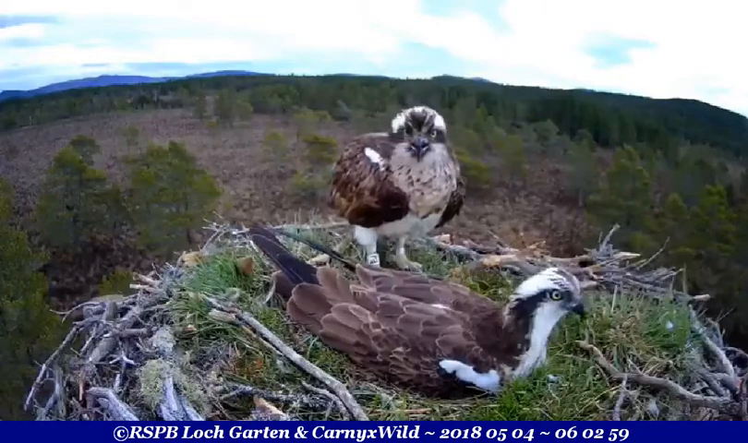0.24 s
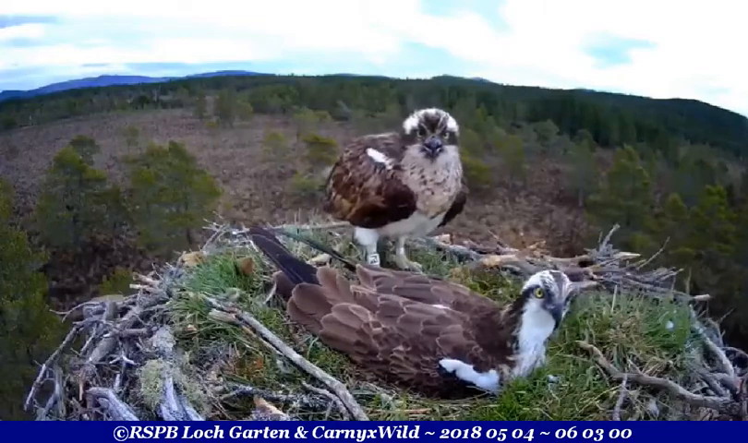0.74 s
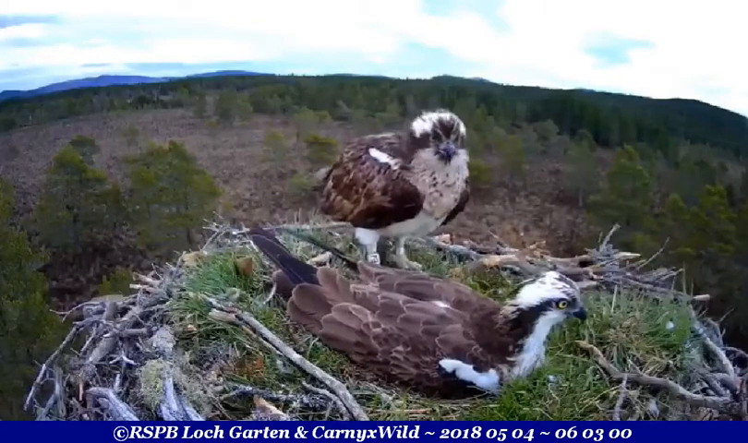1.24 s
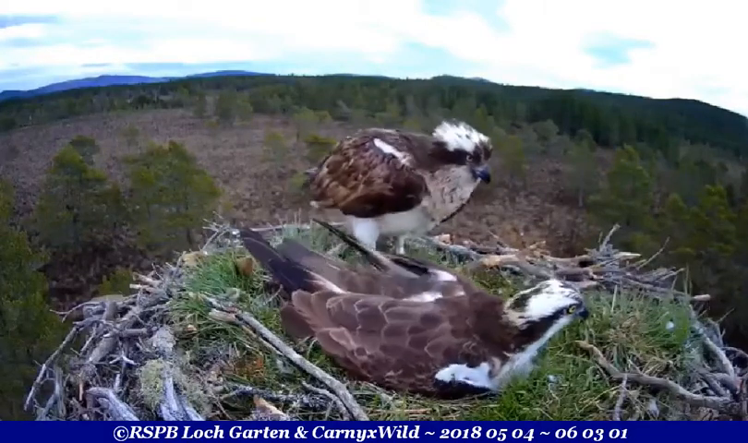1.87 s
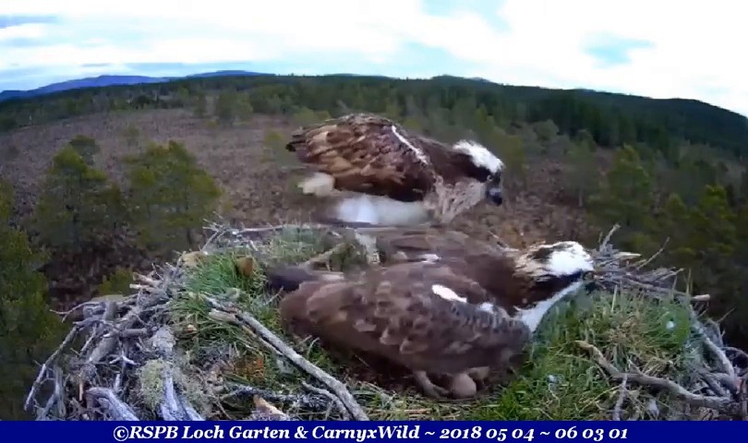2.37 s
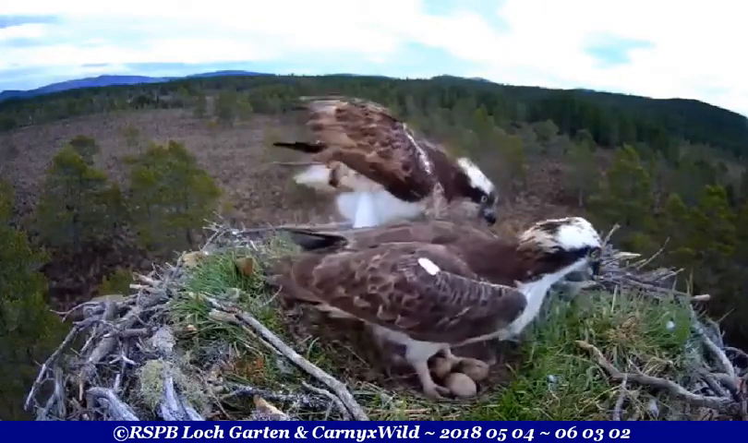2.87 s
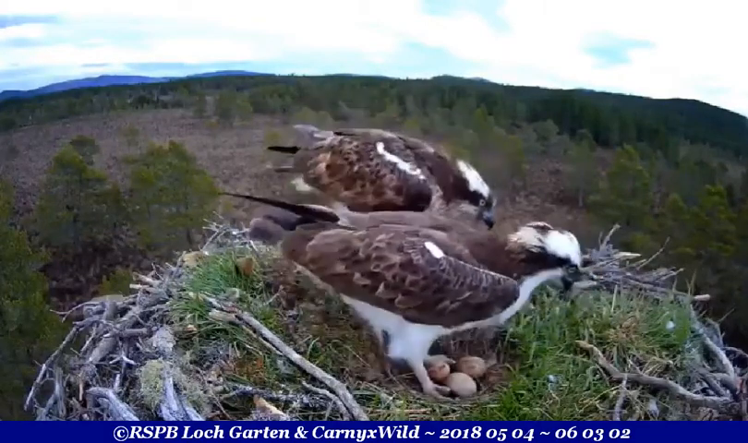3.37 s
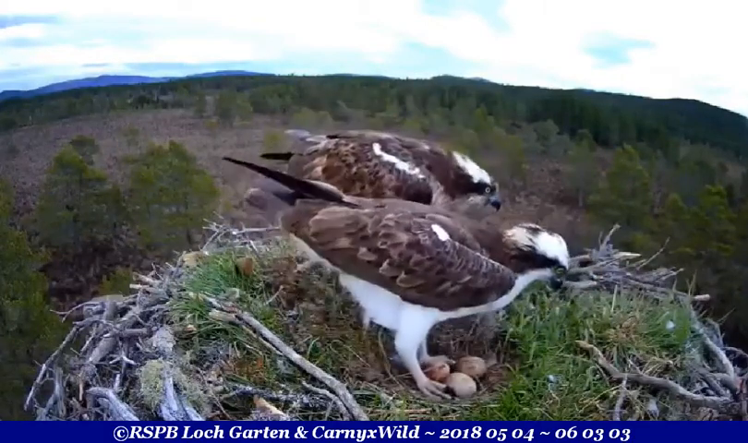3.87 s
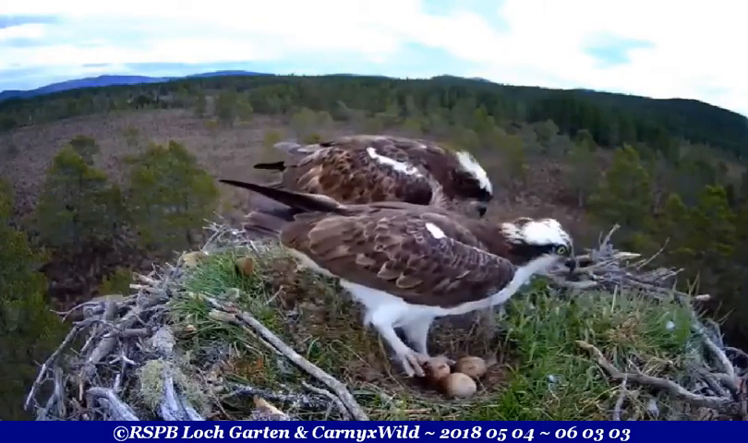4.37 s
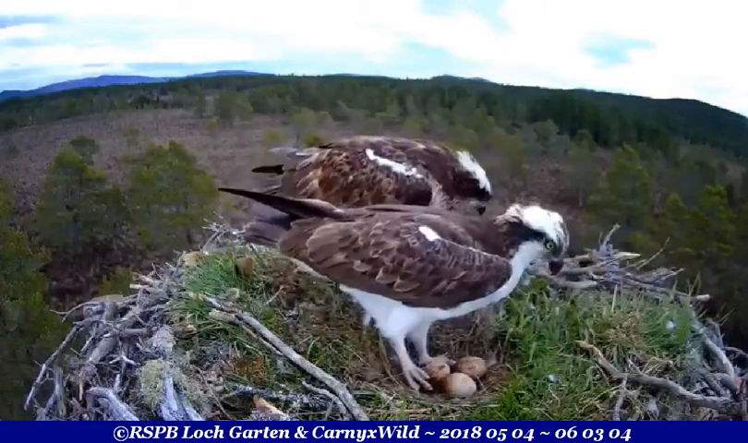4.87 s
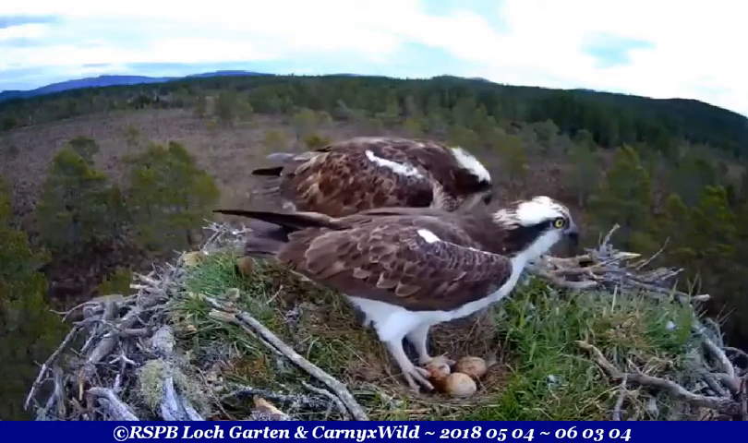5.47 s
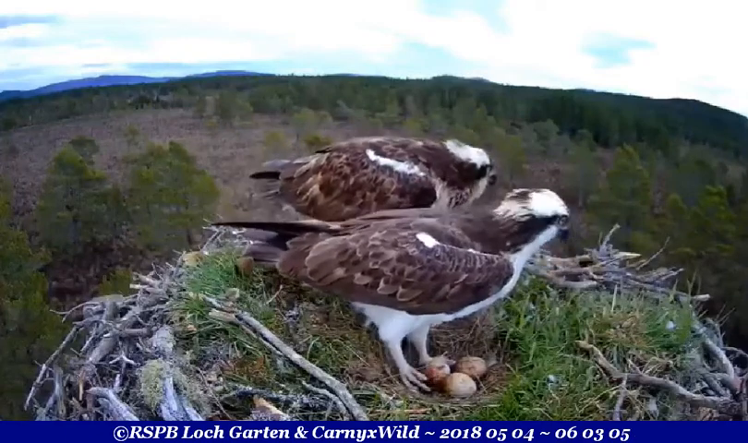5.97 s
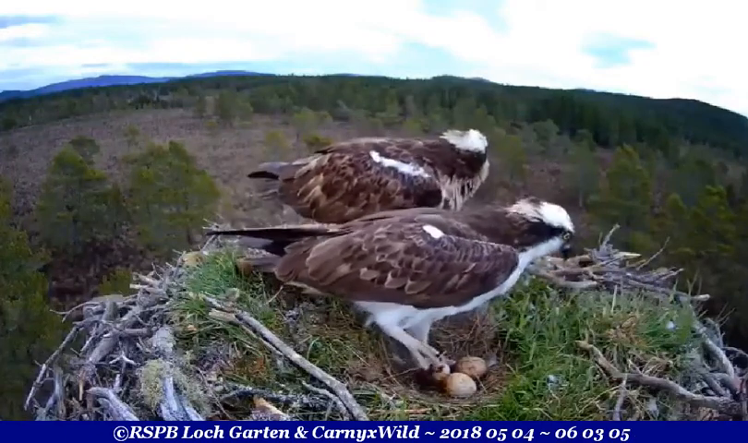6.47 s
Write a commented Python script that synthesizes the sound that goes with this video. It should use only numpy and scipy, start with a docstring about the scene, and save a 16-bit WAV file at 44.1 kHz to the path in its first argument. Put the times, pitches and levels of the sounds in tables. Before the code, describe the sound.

A steady broadband hiss, low soft rush, faint mains hum and very thin high electronic whine start at once and continue to the end. From 0.15 s an osprey very near the microphone gives six short piping whistles around 2 kHz, about every 0.2 s, until 1.5 s; the first are loud enough to clip, later ones weaken. Tiny bill ticks and quick chirps surround them, with a soft low bump at the first. From 1.7 to 2.6 s, four longer yelps crack upward into a rough thin tone and drop back. After a gap, faint high peeps begin at 3.4 s and grow, becoming upward scoops from 4.1 s, long falling glides from 4.7 s and humped slides around 5.2-5.5 s, lightly echoing in trees. Quieter pips overlap from about 4.9 s and continue regularly to 6.7 s; a faint upward slur passes at 5.8 s. Brief dropouts interrupt the birds and thin the hiss.

```python
"""Hiss, a low rush, mains hum and a thin line whistle come first and never stop. Almost at once two ospreys
pipe at their nest, right beside the microphone: short pips, the first ones loud enough to overload it, with
faint ticks and chirps around them. Yelps that break upward follow, then thin sliding whistles that run into
a second row of pips. Calls are swept tones with overtones, shaped by a throat resonance and echoed by nest
and trees; the bed is coloured noise and steady sines. Now and then the sound cuts out briefly."""
import sys
import numpy as np
from scipy import signal
from scipy.fft import rfft, irfft, next_fast_len
from scipy.io import wavfile
from scipy.ndimage import uniform_filter1d, map_coordinates

SR = 44100
rng = np.random.default_rng(int(sys.argv[2]) if len(sys.argv) > 2 else 0)


def unload_wav(signal):
    """Save mono or channel-first audio to the path in sys.argv[1] as 16-bit WAV at rate SR, clipped to [-1, 1]."""
    wavfile.write(
        sys.argv[1],
        SR,
        np.round(np.clip(np.atleast_2d(signal).T, -1, 1) * 32767).astype(np.int16),
    )


N = 295911
TIME = np.arange(N) / SR
MAINS_HZ = 50


def amp(db):
    """Level to amplitude: 20 dB is a factor of ten."""
    return 10 ** (np.asarray(db) / 20)


def unit(x):
    """Normalisation to unit root mean square."""
    return x / np.sqrt(np.mean(x ** 2) + 1e-20)


def along(points, hz):
    """Interpolation of (f/Hz, value) points on a logarithmic frequency axis."""
    f, value = np.transpose(points)
    return np.interp(np.log(hz + 1), np.log(f + 1), value)


def wobble(rate, size):
    """Band-limited random modulation: a smooth curve through random knots, rate knots a second."""
    knots = rng.standard_normal(int(size * rate / SR) + 4)
    return map_coordinates(knots, [np.arange(size) * rate / SR])


def filtered(x, response):
    """Linear filtering: the spectrum times a response of frequency."""
    m = next_fast_len(N + SR // 2)
    spectrum = rfft(x, m)
    return irfft(spectrum * response(np.fft.rfftfreq(m, 1 / SR)), m)[:N]


def noise(spectrum):
    """Coloured noise of rms 1: white noise under a spectral envelope."""
    return unit(filtered(rng.standard_normal(N), lambda hz: amp(along(spectrum, hz))))


def tone(hz):
    """Simple harmonic oscillation of rms 1 at a random phase."""
    return np.sqrt(2) * np.sin(2 * np.pi * (hz * TIME + rng.random()))


def add(track, s, sound):
    """Superposition: mix a sound into the track at time s."""
    part = track[max(round(s * SR), 0):][:len(sound)]
    part += sound[:len(part)]


def floor_levels():
    """Slow level drift: hiss and line whistle levels against time, before their trims."""
    # steady background: t/s, hiss level/dB, line whistle level/dB
    floor = [(0.0, -44.5, -47), (1.25, -46, -61), (3.18, -44.5, -49), (6.47, -42.5, -47.5),
             (6.71, -42, -52)]
    s, *levels = np.transpose(floor)
    return [np.interp(TIME, s, level) for level in levels]


def hiss(hiss_db, on, trim_db=5.0, dropout_db=-8):
    """Broadband noise, nearly flat in spectrum, that weakens in a dropout."""
    # hiss spectrum: f/Hz, relative level per Hz/dB
    colour = [(100, -7.5), (600, -2), (1000, -1.5), (1500, -3.5), (3000, -.5), (5000, -1.3), (10000, -0.23),
              (15500, -0.63)]
    return amp(hiss_db + trim_db + dropout_db * (1 - on)) * noise(colour)


def rush(hiss_db, on, mean_db=-47.0, follow=.3, dropout_db=-3):
    """Low-frequency band noise that follows the hiss drift in part and dips a little in a dropout."""
    # rush spectrum: f/Hz, relative level per Hz/dB
    colour = [(20, -19), (65, -31), (110, -7), (170, 0), (260, 1), (380, -3.5), (500, -10.5), (700, -35),
              (1500, -26)]
    drift = follow * (hiss_db - hiss_db.mean())
    return amp(mean_db + drift + dropout_db * (1 - on)) * noise(colour)


def mains(buzz_db=-76, trim_db=-1.5):
    """Harmonic series of the mains frequency, each level slightly unsteady, with a faint steady buzz."""
    # hum harmonics: f/Hz, rms level before the trim/dB
    harmonics = [(50, -66), (100, -64.5), (150, -62.5), (200, -50), (250, -54), (300, -53), (350, -56.5),
                 (400, -60), (450, -70), (500, -69), (900, -69), (1000, -60.5), (1400, -70), (1500, -78)]
    hum = sum(amp(db + trim_db + wobble(2.88, N)) * tone(hz) for hz, db in harmonics)
    buzz = sum(tone(MAINS_HZ * k) for k in range(11, 33))
    return hum + amp(buzz_db) * buzz


def line_whistle(line_db, trim_db=3, line_hz=15625):
    """A gated sine: scanning at the line rate whistles and pauses between fields."""
    scanning = TIME * MAINS_HZ % 1 > .06
    return amp(line_db + trim_db) * scanning * tone(line_hz)


def bump(s=0.13, width=0.046, db=-47):
    """Noise under a Gaussian envelope: a soft low bump around the first pip."""
    envelope = np.exp(-((TIME - s) / width) ** 2 / 2)
    return amp(db) * envelope * noise([(40, -18), (140, 2), (300, -21), (900, -60)])


def ticks(ring_hz=1900, t60=0.025, crack=0.41):
    """Damped oscillation: a small click of the bill rings and cracks ahead of the first pips."""
    # bill clicks: t/s, level/dB
    clicks = [(.084, -32), (0.314, -29), (.537, -30.5), (.759, -33.5), (.980, -38)]
    out, t = np.zeros(N), np.arange(SR // 20) / SR
    for s, db in clicks:
        click = np.sin(2 * np.pi * ring_hz * t) + crack * rng.standard_normal(len(t))
        add(out, s, amp(db - 60 * t / t60) * click)
    return out


def progress(length, edge):
    """Normalised time: share of a note's length gone by, with half a fade (edge, s) before and after."""
    return np.arange(-edge / 2, length + edge / 2, 1 / SR) / length


def strain(s):
    """Spectral brightening under effort: overtone offset in dB of a short note at time s."""
    # forced pips are brighter: t/s, overtone offset/dB
    effort = [(.15, -0.5), (1.1, 2), (1.5, -6.5), (5.8, 5.5), (6.1, -9)]
    return np.interp(s, *np.transpose(effort))


def whistle(hz, db, edge, waver, flutter_db, overtone_db):
    """Source and filter: the syrinx's nearly pure tone swells as it sweeps the throat's resonance."""
    # throat resonance, acting on the fundamental: f/Hz, gain/dB
    throat = [(1700, 1), (1950, 8), (2120, 9.5), (2220, 8), (2340, 3.5), (2470, 4.5), (2610, -1),
              (2800, 1.5), (7000, 2)]
    # overtones by their own frequency: f/Hz, level re note before offset and flutter/dB
    overtones = [(3400, -6), (4200, -17), (5000, -25.5), (6500, -47), (7350, -37.5), (7750, -24.5),
                 (9000, -38.5), (12000, -44)]
    size = len(hz)
    # waver is a share of the pitch
    phase = 2 * np.pi * np.cumsum(hz * (1 + waver * wobble(351.6, size))) / SR
    wave = amp(along(throat, hz)) * np.sin(phase)
    for k in range(2, 5):
        overtone_level = along(overtones, k * hz) + overtone_db + 4.8 * wobble(336, size)
        wave += amp(overtone_level) * np.sin(k * phase)
    n = np.arange(size)
    to_nearest_end = np.minimum(n, n[::-1])
    gate = np.sin(np.pi / 2 * np.clip(to_nearest_end / (edge * SR), 0, 1)) ** 2
    return wave * gate * amp(db + flutter_db * wobble(133.5, size))


def chirps(rise=0.068, drop=0.131, sag=1.8):
    """Frequency modulation: up-chirps climb evenly, down-chirps sink ever faster; gentle ones fade softly."""
    # upward chirps around the pips: t/s, length/s, start f/Hz, level before throat gain/dB
    upward = [(.1, .017, 2580, -38), (.168, .005, 2760, -16.5), (.324, .017, 2650, -32),
              (.399, 0.0092, 3900, -34.5), (.409, .011, 2770, -31.5), (.771, .02, 2650, -39),
              (.995, .016, 2560, -41), (5.61, 0.009, 2640, -32), (5.625, .011, 2720, -22),
              (6.235, 0.023, 2620, -43.5), (6.662, 0.015, 2620, -39.5)]
    # downward chirps close to a pip: t/s, length/s, start f/Hz, level before throat gain/dB
    downward = [(.116, 0.018, 3420, -40), (.192, 0.013, 2930, -35), (.343, .016, 3450, -42),
                (.573, .013, 3280, -37.5), (1.022, .014, 3130, -33.5), (1.09, .012, 2760, -34.5),
                (1.245, .014, 3180, -39.5), (1.47, .011, 3070, -35.5), (1.53, 0.019, 2650, -40),
                (5.035, .018, 2700, -37), (5.284, 0.028, 2840, -31.5), (5.477, .023, 2900, -26),
                (5.655, 0.038, 2860, -30.5), (5.683, 0.024, 2880, -26), (5.884, 0.031, 2890, -29.5),
                (6.116, .012, 2650, -35)]
    out = np.zeros(N)
    # rise and drop are shares of the start pitch
    for rows, bend, power in (upward, rise, 1), (downward, -drop, sag):
        for s, length, start_hz, db in rows:
            edge = np.interp(db, [-36, -27], [.011, .005])
            hz = start_hz * (1 + bend * np.clip(progress(length, edge), 0, 1) ** power)
            note = whistle(hz, db, edge, waver=.013, flutter_db=1.0, overtone_db=strain(s) - 4)
            add(out, s - edge / 2, note)
    return out


def pips(crest=0.394, droop=2.09, edge=.005, swell_db=0.5, haze_db=-36):
    """Frequency modulation with turbulence: each pip bends at its crest, drops ever faster, and carries air noise."""
    # piping calls: t/s, length/s, start f/Hz, crest f/Hz, end f/Hz, level before throat gain/dB
    calls = [(.152, .017, 2360, 2162, 1830, -9), (0.597, .024, 2320, 2487, 1965, -7.9),
             (.817, .027, 2330, 2460, 1924, -9.5), (1.037, .032, 2310, 2575, 1906, -11),
             (1.265, 0.03, 2410, 2620, 1990, -13.5), (1.485, 0.037, 2217, 2520, 2030, -16.5),
             (3.742, 0.027, 2340, 2500, 1980, -41.5), (4.854, 0.031, 1860, 2220, 1790, -38),
             (5.055, 0.03, 2120, 2540, 1910, -27.5), (5.261, .019, 2180, 2440, 1780, -26.3),
             (5.458, .016, 2230, 2165, 1890, -27.5), (5.655, .02, 2230, 2165, 1860, -28.6),
             (5.867, 0.013, 2240, 2140, 1860, -27.5), (6.073, 0.019, 2350, 2290, 1960, -23.5),
             (6.278, .023, 2190, 2370, 2040, -23), (6.49, .024, 2340, 2306, 2006, -22),
             (6.703, .026, 2226, 2370, 2000, -22.3)]
    # air noise in a forced pip: f/Hz, relative level per Hz/dB
    haze = [(1500, -50), (2600, -5), (3700, 3), (4600, -8), (6000, -17.5), (12000, -26)]
    out = np.zeros(N)
    for s, length, start_hz, crest_hz, end_hz, db in calls:
        u = np.clip(progress(length, edge), -.1, 1.1)
        before = np.maximum(1 - u / crest, 0) ** 2
        after = np.maximum((u - crest) / (1 - crest), 0) ** droop
        hz = crest_hz + (start_hz - crest_hz) * before + (end_hz - crest_hz) * after
        level = db + swell_db * (u - .5)
        note = whistle(hz, level, edge, waver=0.01, flutter_db=0.8, overtone_db=strain(s))
        add(out, s - edge / 2, note)
    envelope = uniform_filter1d(np.abs(out), size=200)
    return out + amp(haze_db) * envelope * noise(haze)


def connected():
    """Gating: 1 while the sound comes through, 0 during a dropout, with brief ramps."""
    # moments when the sound cuts out: t/s, length/s
    gaps = [(0.379, 0.018), (0.878, 0.058), (1.504, .023), (2.105, 0.0244), (2.706, 0.02), (3.306, .021),
            (3.544, 0.019), (3.905, 0.026), (4.385, 0.022), (4.481, 0.021), (4.745, 0.023), (5.226, 0.021),
            (5.635, .021), (6.427, .021)]
    off = sum((TIME > s) & (TIME < s + length) for s, length in gaps)
    return 1 - uniform_filter1d(np.minimum(off, 1) * 1., size=30)


def rasp(pitch, db, beat_hz=850, spread=0.31, upper_db=-6, lower_db=-12, break_hz=2850):
    """Sidebands: above the break a second, unsteady oscillation roughens the tone."""
    beat = beat_hz * (1 + spread * wobble(498, len(pitch)))
    side = lambda hz: np.sin(2 * np.pi * np.cumsum(hz) / SR)
    broken = np.clip((pitch - break_hz) / 100, 0, 1)
    return broken * amp(db) * (amp(upper_db) * side(pitch + beat) + amp(lower_db) * side(pitch - beat))


def yelps(edge=0.0036, arch=0.0465, push_db=1):
    """Register break: a yelp climbs and swells, jumps to a thin, rough arch, then drops back."""
    # drawn-out pips that break upward: t/s, length/s, top f/Hz, level before throat gain/dB, change at the top/dB
    calls = [(1.709, .058, 3190, -23, -6), (1.959, .056, 3010, -22, -6.5), (2.215, .072, 3190, -28, -14),
             (2.513, 0.071, 3210, -31, -14)]
    start_hz, break_hz, end_hz = 2070, 2478, 1970
    breaks_at, returns_at, jump = .25, .87, .09  # shares of the length
    out = np.zeros(N)
    for s, length, top_hz, db, top_db in calls:
        u = progress(length, edge)
        low = np.interp(u, [0, breaks_at, returns_at, 1], [start_hz, break_hz, break_hz, end_hz])
        across = 2 * (u - breaks_at) / (returns_at - breaks_at) - 1  # -1 to 1 over the arch
        broken = np.clip(np.minimum(u - breaks_at, returns_at - u) / jump, 0, 1)
        high = top_hz * (1 - 2 * arch * across ** 2)
        hz = uniform_filter1d(low + broken * (high - low), size=180)
        push = push_db * ((low - start_hz) / (break_hz - start_hz) - .5)
        level = db + (1 - broken) * push + broken * top_db
        note = whistle(hz, level, edge, waver=0.019, flutter_db=1.0, overtone_db=-3.5)
        add(out, s - edge / 2, note + rasp(hz, level))
    return out


def slide(path, at, db, edge):
    """Continuous glide: one smooth whistle along a path of pitch and level."""
    knots, hz, level = np.transpose(path)
    pitch = uniform_filter1d(np.interp(at, knots, hz), size=180)
    level = db + np.interp(at, knots, level)
    return whistle(pitch, level, edge, waver=0.006, flutter_db=1.5, overtone_db=-13)


def slides(edge=.0056):
    """Time scaling: each call stretches the shape of its kind to its own length; an upward slur ends the run."""
    # Shapes: share of the length, f/Hz, level/dB. Calls: t/s, length/s, level/dB.
    # The two levels add, before the throat gain.
    # thin peeps that grow louder one by one and are faintest at their peak
    peep_shape = [(0, 5580, 0), (.31, 6750, -19), (.44, 5700, -5), (.62, 5000, -13), (.75, 4520, 0.5),
                  (1, 4300, -6)]
    peep_calls = [(3.43, .08, -38), (3.602, 0.07, -33), (3.782, .072, -26.5), (3.965, 0.081, -24)]
    # a flick up, a dip, then a scoop to a held high note
    scoop_shape = [(0, 3150, -21), (.14, 3895, 1), (.29, 3560, -4.5), (.43, 3460, -2.5), (.55, 4200, -1),
                   (.73, 4540, 0), (1, 4613, -7)]
    scoop_calls = [(4.131, .12, -22), (4.33, 0.12, -21), (4.526, .123, -20.5)]
    # a long sag that tumbles at the end
    fall_shape = [(0, 4800, -21), (.15, 4436, -2), (.34, 4190, -10.5), (.47, 4108, 0), (.66, 3980, -0.5),
                  (.83, 3107, -7), (1, 2360, -22)]
    fall_calls = [(4.722, .165, -20.5), (4.955, .165, -21.5)]
    # a low sag, a hump and a drop
    hump_shape = [(0, 3070, -12.5), (.26, 2780, -4), (.46, 3140, -5), (.64, 3850, 2), (.8, 3110, -6),
                  (1, 2550, -8.5)]
    hump_calls = [(5.185, .14, -24), (5.4, .135, -25.5)]
    # the one upward slur: t/s, f/Hz, level before throat gain/dB
    slur = [(5.757, 2554, -38), (5.785, 2700, -27), (5.834, 2777, -29), (5.88, 3090, -34),
            (5.91, 3370, -32.5), (5.955, 3730, -42)]
    kinds = ((peep_shape, peep_calls), (scoop_shape, scoop_calls),
             (fall_shape, fall_calls), (hump_shape, hump_calls))
    out = np.zeros(N)
    for shape, calls in kinds:
        for s, length, db in calls:
            add(out, s - edge / 2, slide(shape, progress(length, edge), db, edge))
    t = np.arange(slur[0][0], slur[-1][0], 1 / SR)
    add(out, t[0], slide(slur, t, 0, edge))
    return out


def outdoors(x, nest_db, trees_db, nest_t60=0.067):
    """Scattering and reverberation: the nest's sticks reply after 3 ms, the treetops answer faintly."""
    # what the nest scatters back: f/Hz, gain/dB
    stick_colour = [(2100, -8), (2700, 6.5), (3500, 12.5), (4100, 8.5), (5000, 5), (8000, -2)]
    # decay time among the trees: f/Hz, t60/s
    tree_decay = [(2000, 0.39), (4500, 0.58), (10000, 0.39)]
    t = np.arange(SR // 8) / SR
    sticks = rng.standard_normal(len(t)) * amp(-60 * t / nest_t60) * (t > .003)
    # each frequency of the tree response dies away at its own rate
    hz, t, z = signal.stft(rng.standard_normal(SR // 2), SR, nperseg=256)
    decay = amp(-60 * t / along(tree_decay, hz)[:, None])
    trees = signal.istft(z * decay, SR, nperseg=256)[1]
    answer = lambda h: signal.fftconvolve(x, h / np.linalg.norm(h))[:N]
    scatter = filtered(answer(sticks), lambda hz: amp(along(stick_colour, hz)))
    return x + amp(nest_db) * scatter + amp(trees_db) * answer(trees)


def birds(bounce=0.39, bounce_s=.0042, far_db=-2.0):
    """Comb interference: the sliding whistles beat against their bounce off the nest; the pips lack it."""
    near = pips() + chirps() + ticks() + yelps()
    comb = lambda hz: 1 + bounce * np.exp(-2j * np.pi * hz * bounce_s)
    far = filtered(amp(far_db) * slides(), comb)
    near_heard = outdoors(near, nest_db=-15, trees_db=-37)
    far_heard = outdoors(far, nest_db=-21.0, trees_db=-12.5, nest_t60=.15)
    return near_heard + far_heard


def scene():
    """Superposition: birds and most of the hiss vanish in a dropout; hum and line whistle run on."""
    hiss_db, line_db = floor_levels()
    on = connected()
    bed = hiss(hiss_db, on) + rush(hiss_db, on) + mains() + line_whistle(line_db)
    return (bed + bump() + on * birds())[None]


def record(dry, top=1.02, hardness=16, band_limit_hz=15780):
    """Saturation and band limiting: the input clips on the loudest pips and passes nothing above its limit."""
    x = dry[0] / (1 + np.abs(dry[0] / top) ** hardness) ** (1 / hardness)
    return filtered(x, lambda hz: hz < band_limit_hz)[None]


dry = scene()
out = record(dry)
unload_wav(out)
```